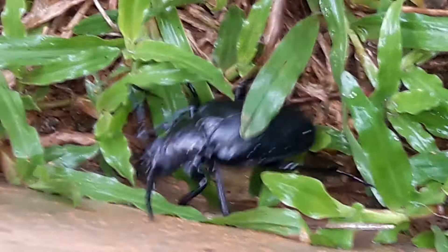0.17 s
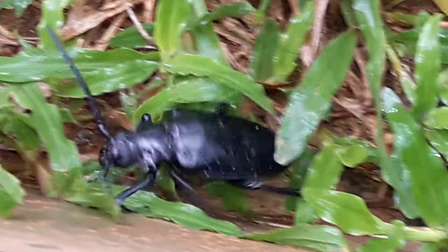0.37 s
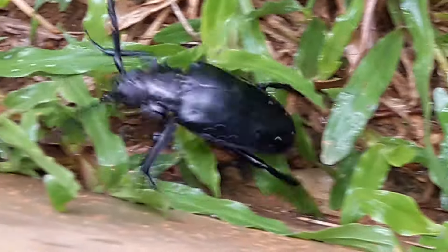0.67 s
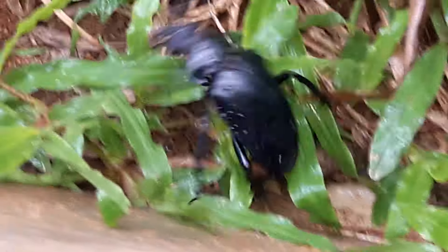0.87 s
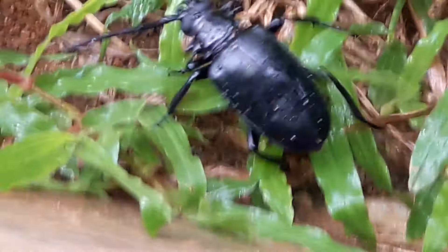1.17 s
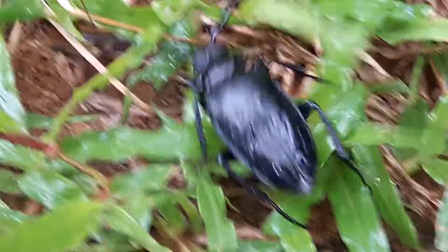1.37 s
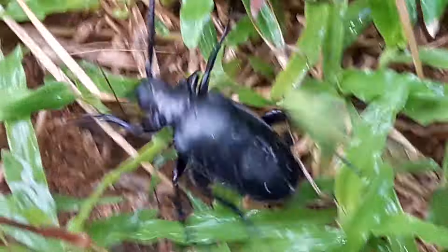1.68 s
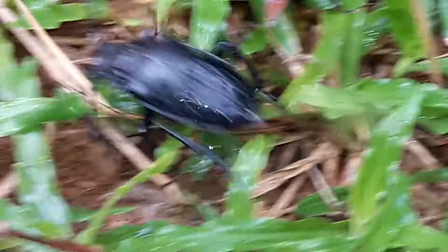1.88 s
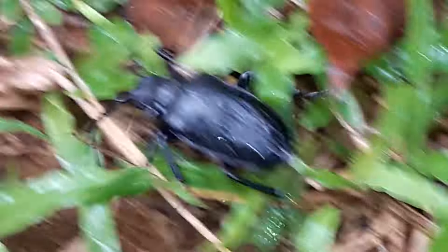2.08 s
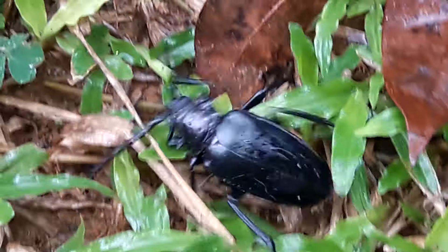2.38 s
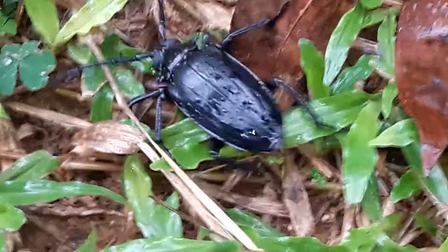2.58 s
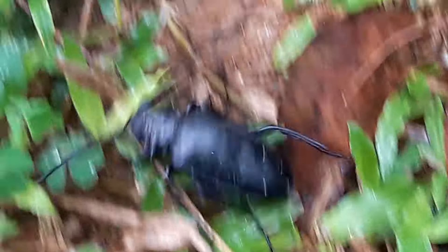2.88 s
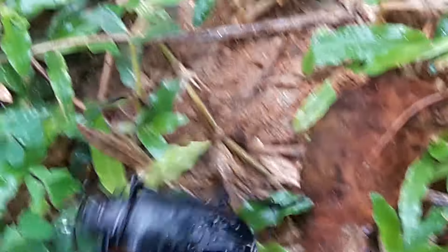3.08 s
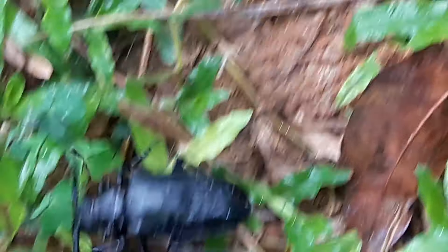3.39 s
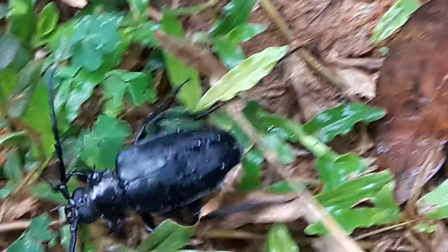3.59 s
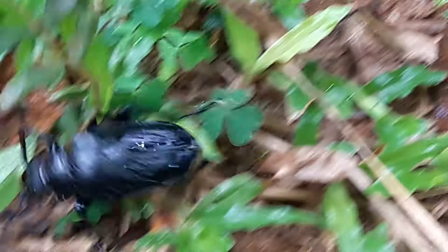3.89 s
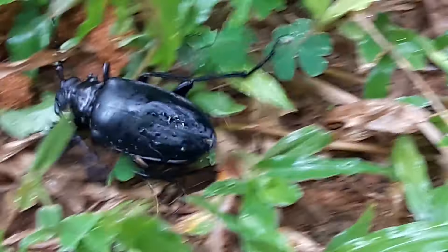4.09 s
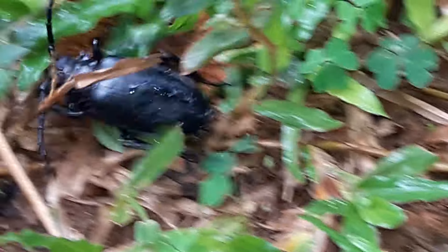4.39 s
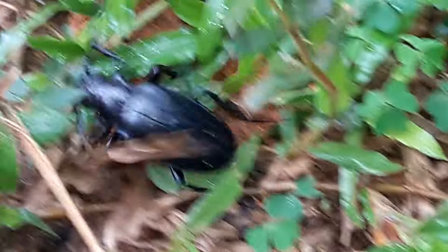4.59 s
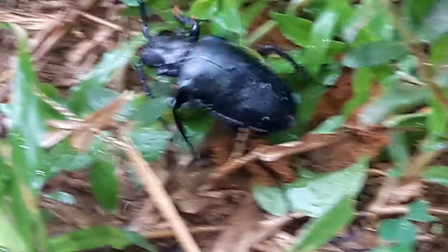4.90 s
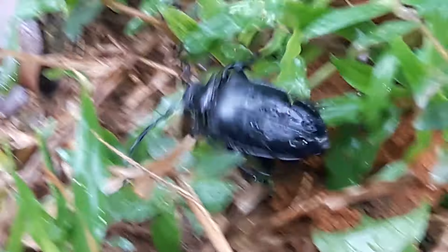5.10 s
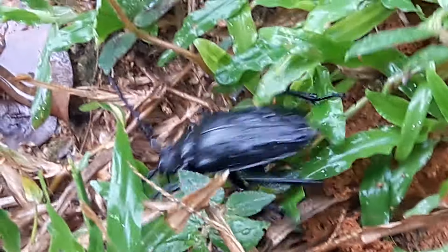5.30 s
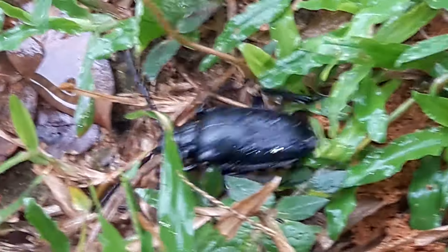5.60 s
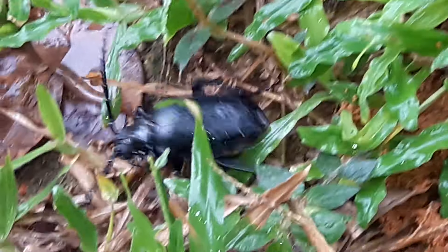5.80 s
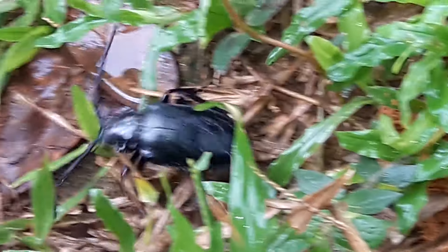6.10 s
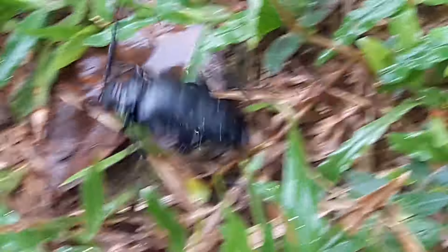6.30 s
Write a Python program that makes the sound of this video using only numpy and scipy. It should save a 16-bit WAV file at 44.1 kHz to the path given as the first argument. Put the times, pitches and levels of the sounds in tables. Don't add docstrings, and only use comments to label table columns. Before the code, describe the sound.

Even outdoor rainfall close to the ground, soft wash scattered with sharp leaf taps, tiny spray bursts and bubbly plinks, turning brighter midway.

```python
import sys
import numpy as np
from scipy import signal
from scipy.fft import rfft, irfft
from scipy.io import wavfile
from scipy.ndimage import uniform_filter1d

SR = 44100
rng = np.random.default_rng(int(sys.argv[2]) if len(sys.argv) > 2 else 0)


def ratio(d):
    e = np.asarray(d, float) / 20
    return 10 ** e


def persist_wave(psi):
    counts = np.round(np.clip(psi, -1, 1) * 32767).astype(np.int16)
    wavfile.write(sys.argv[1], SR, np.atleast_2d(counts).T)


N = 284004


def evened(x):
    return x / np.sqrt(np.mean(x ** 2) + 1e-20)


def read(points, hz):
    f, value = np.transpose(points)
    return np.interp(np.log(hz + 1), np.log(f + 1), value)


def add(mix, s, sound):
    part = mix[max(round(s * SR), 0):][:len(sound)]
    part += sound[:len(part)]


def heading(t):
    # time in seconds, wash level in dB, facing the leaves from 0 to 1.
    turns = [(0, -35, 0.36), (1, -35.5, 0.28), (1.9, -35.5, .2), (2.2, -36, 0.15), (2.5, -34.5, 0.62),
             (3, -36, 1), (4, -35.5, 0.91), (5, -36, 0.98), (5.4, -36, 0.83), (6.2, -35.5, 1),
             (6.44, -34, 0.74)]
    s, level_db, facing = np.transpose(turns)
    return np.interp(t, s, level_db), np.clip(np.interp(t, s, facing), -.3, 1.3)


def echo():
    # frequency in Hz, time to fall by 60 dB in seconds.
    fall_times = [(500, 0.13), (2000, 0.25), (5000, 0.14), (12000, 0.22)]
    taps = np.zeros(8192)
    at = np.arange(90, 7890, 40) + rng.integers(0, 40, 195)
    taps[at] = rng.choice([-1., 1.], 195) * rng.uniform(0.2, 1, 195)
    hz, t, z = signal.stft(taps, SR, nperseg=128)
    fall = ratio(-60 * t / read(fall_times, hz)[:, None])
    tail = signal.istft(z * fall, SR, nperseg=128)[1]
    return tail / np.linalg.norm(tail)


def ping(hz, cycles, glide=0.017, start=0.52):
    turn = np.arange(320) / SR * hz
    swell = 1 - np.exp(-turn / max(start, .05))
    decay = np.exp(-(turn / max(cycles, .7)) ** (1.8 + 25 * glide))
    rising = turn * (1 + glide * np.minimum(turn, 8)) / (1 + glide * cycles)
    sound = swell * decay * np.sin(2 * np.pi * rising)
    return sound / abs(sound).max()


def spray(noise, hz=11000, last_s=.0009):
    t = np.arange(len(noise)) / SR
    puff = noise * np.minimum(t / .0001, 1) * np.exp(-t / last_s)
    puff = signal.sosfilt(signal.butter(6, 8000, "high", fs=SR, output="sos"), puff)
    puff = .35 * puff + signal.lfilter(*signal.iirpeak(hz, 3.0, fs=SR), puff)
    return puff / abs(puff).max()


def scatter(per_s, spread_db):
    size = ratio(spread_db * np.minimum(rng.exponential(1, N), 4))
    return size * (rng.random(N) < per_s / SR)


def strays(count, db, spread_db, facing_db, low_hz, away_hz, facing_hz):
    when, size, pitch = rng.random((count, 3)).T
    s = (np.arange(count) + when) / count * N / SR
    facing = np.clip(heading(s)[1], 0, 1)
    top_hz = away_hz + (facing_hz - away_hz) * facing
    level_db = db + spread_db * (2 * size - 1) + facing_db * facing
    return list(zip(s, level_db, low_hz + (top_hz - low_hz) * pitch))


def hum():
    # pitch in Hz, waver in Hz, nearest moment in seconds,
    # level there in dB, fading in dB per second.
    motors = [
        (120, 2, .3, -54.5, 16),
        (134, 2.5, 0, -58, 6),
        (154.7, 2, 1.8, -60, 6),
        (118, 2.1, 3.2, -63, 14),
        (134.4, 1.97, 4.5, -57, 4),
        (151.3, 2.36, 5.9, -59, 10),
    ]
    t, out = np.arange(N) / SR, np.zeros(N)
    for hz, width, nearest_s, level_db, fade_db in motors:
        waver = width * evened(uniform_filter1d(rng.standard_normal(N), size=6000))
        level = ratio(level_db - fade_db * abs(t - nearest_s))
        out += level * np.sqrt(2) * np.sin(2 * np.pi * np.cumsum(hz + waver) / SR)
    return out


def wash():
    # frequency in Hz, level in dB per Hz.
    away = [(160, -35), (280, -2), (472, -3), (588, -1), (684, -3), (1480, 0.5), (2680, -2.5), (3510, -2.5),
            (5430, -10.5), (7360, -7), (8140, -8.5), (9160, -11), (10800, -18.5), (15700, -17.5)]
    # frequency in Hz, level in dB per Hz.
    toward = [(160, -36), (280, -6), (420, -1.5), (796, -2.5), (1700, 0), (2910, -4.5), (4440, -2.5),
              (6220, -7), (7230, -3), (8140, -10.5), (8850, -12.5), (12600, -15.5), (14900, -11),
              (15700, -9)]
    # frequency in Hz, level in dB per Hz.
    town = [(18, -52), (30, -24), (97, -1.5), (135, -3), (188, 0), (330, -3.5), (430, -34), (730, -120)]
    frames, hz = N // 128 + 6, np.fft.rfftfreq(512, 1 / SR)
    a, b, patches = rng.standard_normal((frames, 257, 3)).T
    patches = uniform_filter1d(patches, size=8, axis=0)
    patches = evened(uniform_filter1d(patches, size=20, axis=1))
    flicker = evened(uniform_filter1d(rng.standard_normal(frames), size=5))
    facing = heading(np.arange(frames) * 128 / SR)[1]
    shade = 1 + 1.8 * np.clip((hz - 5000) / 7000, 0, 1)
    seen = np.clip(facing, 0, None) ** shade[:, None]
    colour_db = read(away, hz)[:, None] * (1 - seen) + read(toward, hz)[:, None] * seen
    treble = np.clip(np.log2(hz / 1000 + 1e-3) / 3, 0, 1)[:, None]
    z = (a + 1j * b) * ratio(colour_db + 0.75 * patches + 1.8 * treble ** 2 * flicker)
    upper = signal.istft(z * (hz > 300)[:, None], nperseg=512, noverlap=384)[1][:N]
    fine = np.fft.rfftfreq(N, 1 / SR)
    bass = irfft(rfft(rng.standard_normal(N)) * ratio(read(town, fine)) * (fine < 310), N)
    t = np.arange(N) / SR
    rumble = signal.sosfilt(signal.butter(2, 70, fs=SR, output="sos"), bass)
    rumble *= np.exp(-t / 5.2)
    mix = evened(upper) + ratio(-16.5) * evened(bass) + ratio(-27.5) * evened(rumble)
    return mix * ratio(heading(t)[0] - 2.0)


def patter():
    # pitch in Hz, ring in cycles, drops per second,
    # level turned away in dB, gain when facing the leaves in dB.
    sizes = [
        (1310, 2.5, 250, -53, -9),
        (2130, 1.7, 300, -50.5, -1),
        (3690, 3.9, 300, -52, -8.5),
        (6420, 3, 400, -55.5, 10),
    ]
    out, facing = np.zeros(N), heading(np.arange(N) / SR)[1]
    for hz, cycles, per_s, db, facing_db in sizes:
        ring = np.zeros(N)
        for octaves in rng.uniform(-0.41, 0.37, 6):
            drops = scatter(per_s / 6, spread_db=3.5)
            ring += signal.oaconvolve(drops, ping(hz * 2 ** octaves, cycles))[:N]
        out += ratio(db + facing_db * facing) * evened(ring)
    out += ratio(-7.5) * signal.fftconvolve(out, echo())[:N]
    burst = np.zeros(N)
    for noise, hz in zip(rng.standard_normal((6, 128)), np.linspace(9000, 15000, 6)):
        drops = scatter(per_s=380 / 6, spread_db=3.2)
        burst += signal.oaconvolve(drops, spray(noise, hz))[:N]
    return out + ratio(-57.5 + 7 * facing) * evened(burst)


def ticks():
    # time in seconds, peak in dB, leaf pitch in Hz.
    leaf_drops = [(.218, -24, 4860), (0.667, -27, 6120), (.201, -30, 4700), (1.4025, -25, 4600),
                  (1.4222, -26, 7400), (1.861, -24, 7300), (1.9384, -25, 4660), (2.166, -26, 4700),
                  (2.5047, -22.5, 4900), (2.6751, -21, 4850), (3.33, -23, 5140), (3.4868, -12.5, 6800),
                  (3.6038, -24, 7350), (3.8921, -27, 5120), (4.0063, -23, 7030), (4.3211, -27, 6810),
                  (4.432, -23, 7250), (4.693, -27, 4660), (2.8948, -26, 6940), (5.1545, -25, 7130),
                  (5.509, -23, 7300), (5.549, -20, 7500), (5.612, -24, 7100), (5.656, -25, 7250),
                  (5.762, -21.5, 4870), (2.7819, -23, 4500), (2.4648, -27, 7330), (6.123, -26, 7210),
                  (6.2002, -29, 6340), (6.394, -25, 5080)]
    # time in seconds, peak in dB, pitch in Hz.
    snaps = [
        (1.1834, -18, 5500),
        (1.8622, -24, 10000),
        (2.6762, -21, 6500),
        (2.7829, -21, 3000),
        (3.488, -12, 3200),
        (4.1936, -23, 3000),
        (4.2325, -20.5, 3000),
        (5.979, -17, 5000),
        (6.2015, -16.5, 3400),
        (6.4308, -23, 5200),
    ]
    # time in seconds, peak in dB, centre in Hz.
    near_bursts = [(2.3905, -31, 9500), (.402, -27, 9600), (.8787, -33, 9530), (1.8612, -26, 13000),
                   (2.4648, -29, 8600), (6.4298, -34, 14000), (2.674, -25, 11500), (2.961, -30, 12900),
                   (3.1218, -33, 14900), (4.3206, -33, 14500), (4.9605, -29, 14000), (3.433, -32, 13200),
                   (3.487, -22, 12200), (3.5264, -32, 10500), (3.6042, -31, 14900), (3.6451, -29, 13300),
                   (4.0018, -26, 11100), (4.0178, -26, 10300), (4.0761, -21.5, 15000), (3.265, -29, 9030),
                   (2.5052, -30, 9500), (4.3525, -29, 12300), (4.4313, -23, 10300), (4.531, -30, 13000),
                   (4.628, -27, 9000), (4.9527, -22, 14700), (5.0998, -28, 10700), (3.1595, -30, 10500),
                   (5.5074, -23, 13000), (5.9778, -27, 14400)]
    out = np.zeros(N)
    leaf_drops = leaf_drops + strays(count=30, db=-36, spread_db=3, facing_db=1,
                                     low_hz=4700, away_hz=7400, facing_hz=7400)
    for s, db, hz in leaf_drops:
        cycles = 2.4 + hz * .0003
        add(out, s + .0012, ratio(db - 1) * ping(hz, cycles, glide=.004, start=.25))
    for s, db, hz in snaps:
        snap = ping(hz, cycles=.9, glide=0, start=.06)
        add(out, s, ratio(db + 1) * signal.lfilter([1, -1], [1, -.85], snap))
    near_bursts = near_bursts + strays(count=110, db=-39.5, spread_db=4, facing_db=5,
                                       low_hz=8500, away_hz=12000, facing_hz=15500)
    for (s, db, hz), noise in zip(near_bursts, rng.standard_normal((len(near_bursts), 192))):
        last_s = np.interp(db, [-32, -20], [.001, .00035])
        add(out, s + .001, ratio(db + 5) * spray(noise, hz, last_s))
    return out + ratio(-12) * signal.fftconvolve(out, echo())[:N]


def plinks():
    # time in seconds, peak in dB, bubble pitch in Hz, echo in dB.
    small_drops = [(.382, -29, 1720, -7), (.397, -26, 1510, -3), (.609, -30.5, 1240, 1),
                   (0.675, -28, 4000, 0), (1.264, -32, 1310, -2), (1.3598, -29, 1420, -5),
                   (1.4554, -31, 1330, -1), (1.58, -32, 2060, -1), (1.7766, -21.5, 3650, -4),
                   (2.0484, -27, 3280, -7), (2.0941, -28, 4070, 2), (2.2005, -25, 3440, 1),
                   (2.2234, -26.5, 4190, 5), (2.7644, -27.5, 4270, 6), (2.7824, -21.5, 2330, -3),
                   (3.1218, -25, 4750, -3), (4.006, -36, 1660, 5), (4.1921, -26.5, 2100, -11),
                   (4.232, -24, 3600, 3), (4.505, -28.5, 4550, 10), (4.5785, -27, 4320, -4),
                   (5.0973, -32, 2530, 1), (5.1921, -27, 4360, -3), (5.5095, -21, 4300, -12),
                   (5.8112, -27, 1460, -13), (5.978, -26, 4420, -11), (2.3905, -30, 4600, -6),
                   (6.4138, -24.5, 2440, 0)]
    # time in seconds, peak in dB, bubble pitch in Hz, ring in cycles, echo in dB.
    large_drops = [(.0001, -14, 2460, 0.88, -25), (0.2121, -13, 3460, 1.4, 1), (0.2188, -16, 2100, 2.4, -9),
                   (1.1826, -22, 3940, 5, 1), (1.291, -28.5, 2650, 11, -2), (1.3036, -17.5, 2860, 2.7, -16),
                   (1.645, -25, 3440, 3.7, -10), (0.876, -25, 3350, 4.6, -10),
                   (1.9376, -15.5, 3200, 1.3, -2), (1.9381, -14, 2040, 2.6, -3.5),
                   (3.4873, -22, 1900, 1.2, -22), (5.9797, -25, 3980, 4.5, -10), (4.2555, -31, 3300, 4, -2),
                   (4.1934, -26, 3700, 4.8, -10), (4.249, -32, 3280, 4, -8), (6.428, -27, 2500, 4.6, 0)]
    # time in seconds, peak in dB,
    # bubble pitch in Hz, ring in cycles, pitch rise per cycle as a share.
    sliders = [
        (.3123, -28.5, 2150, 6.3, .038),
        (5.5417, -18.5, 1570, 5.1, 0.19),
        (5.568, -26, 2140, 2.2, 0.041),
    ]
    # s, peak dB, Hz, cycles, echo dB, pitch rise a cycle
    drops = [(s, db, hz, 2.46, echo_db, 0.021) for s, db, hz, echo_db in small_drops]
    drops += [(*row, 0.016) for row in large_drops]
    drops += [(*row, -2.5, rise) for *row, rise in sliders]
    out = np.zeros(N)
    for s, db, hz, cycles, echo_db, glide in drops:
        slap = ratio(-6 - 90 * glide) * ping(1.7 * hz, cycles=1.2, start=.1)
        swell = 0.45 + 22 * glide + 0.06 * cycles ** 2
        bubble = ping(hz, cycles, glide, swell)
        add(out, s + .0009, ratio(db + .6) * (bubble + slap))
        add(out, s + .0009, ratio(db + echo_db) * signal.fftconvolve(bubble + 1.5 * slap, echo()))
    return out


def scene():
    return (hum() + wash() + patter() + ticks() + plinks())[None]


def low_pass(x):
    return signal.sosfilt(signal.butter(12, 17040, fs=SR, output="sos"), x)


def record(dry):
    # centre in Hz, width in Hz, change in dB.
    treble_shape = [
        (8020, 120, -7.5),
        (15600, 410, 0.5),
    ]
    hz = np.fft.rfftfreq(N, 1 / SR)
    colour_db = sum(db * np.exp(-((hz - centre_hz) / width) ** 2) for centre_hz, width, db in treble_shape)
    colour_db -= 20 * np.log10(1 + (48 / (hz + 1)) ** 2)
    colour_db -= np.clip((hz - 15830) / 3, 0, 75)
    mix = irfft(rfft(dry) * ratio(colour_db), N) - .0007
    return low_pass(mix)


dry = scene()
out = record(dry)
persist_wave(out)
```